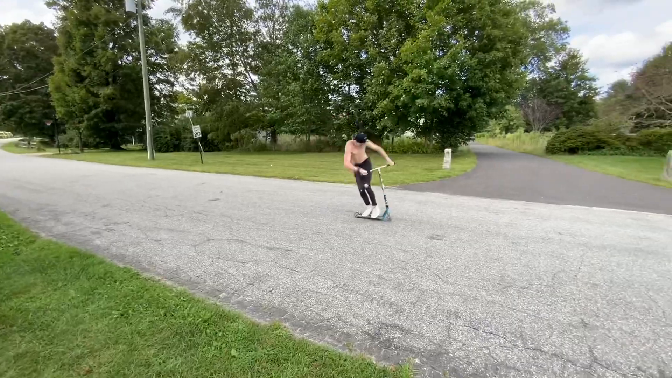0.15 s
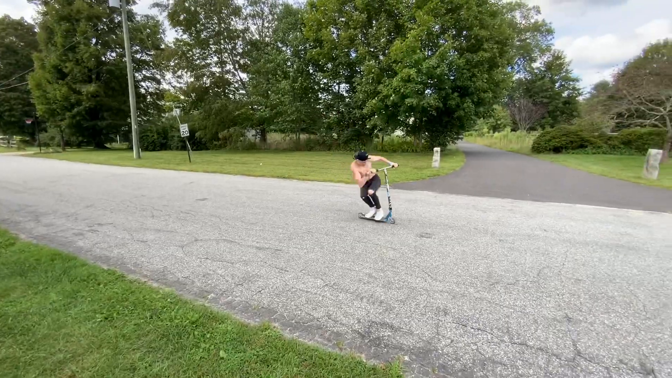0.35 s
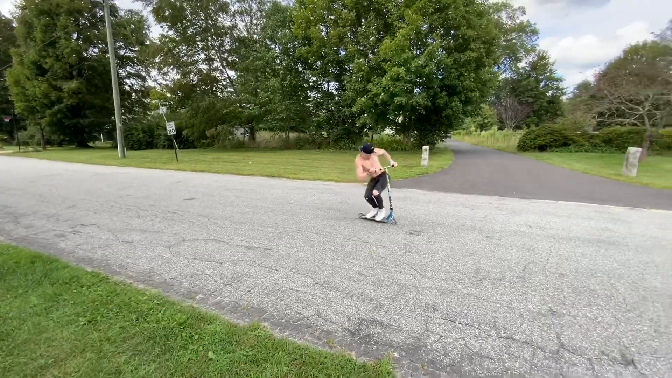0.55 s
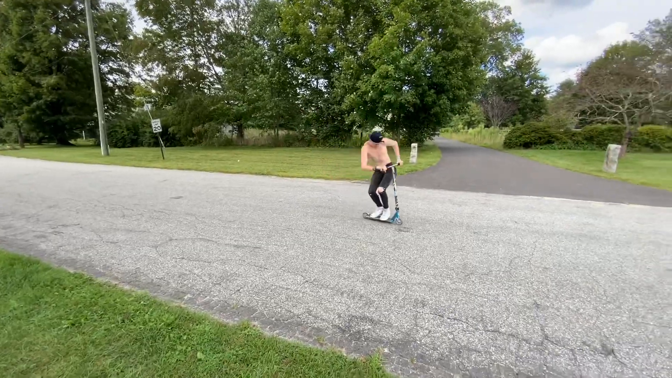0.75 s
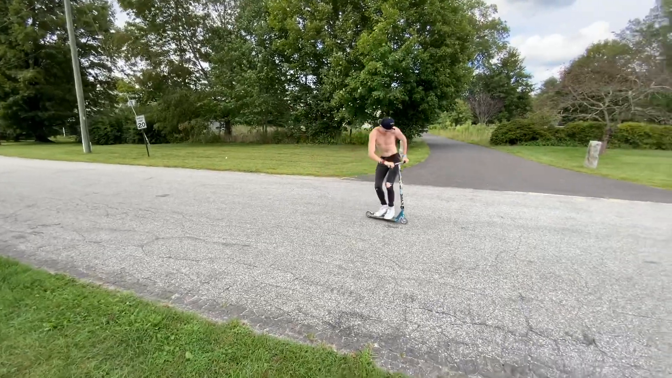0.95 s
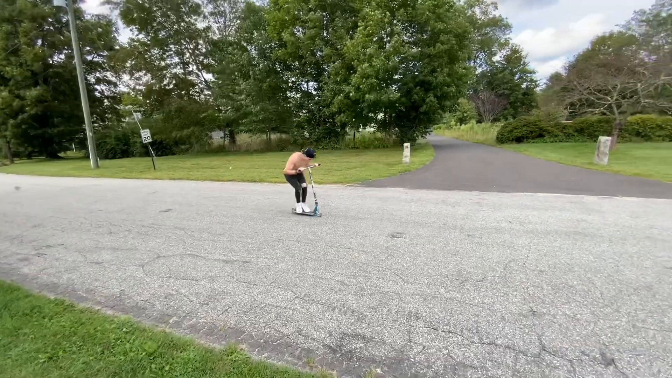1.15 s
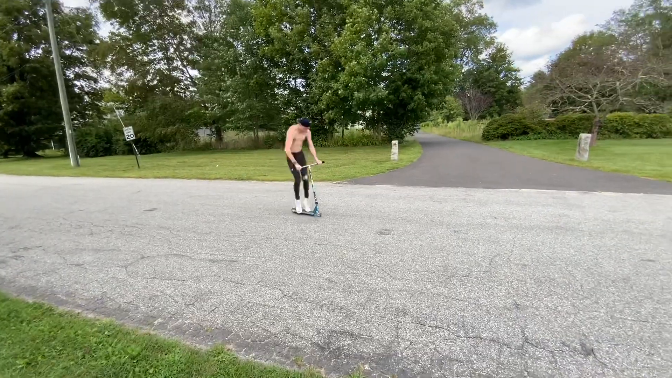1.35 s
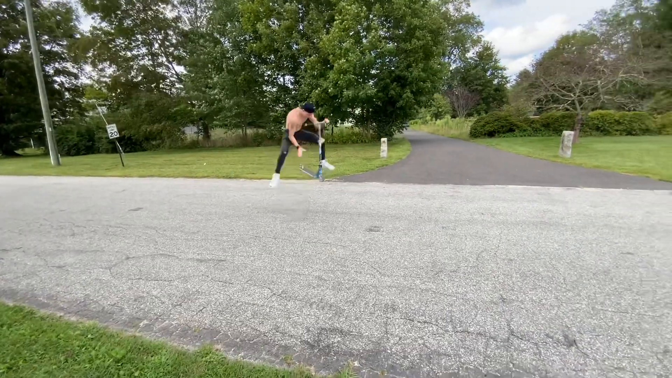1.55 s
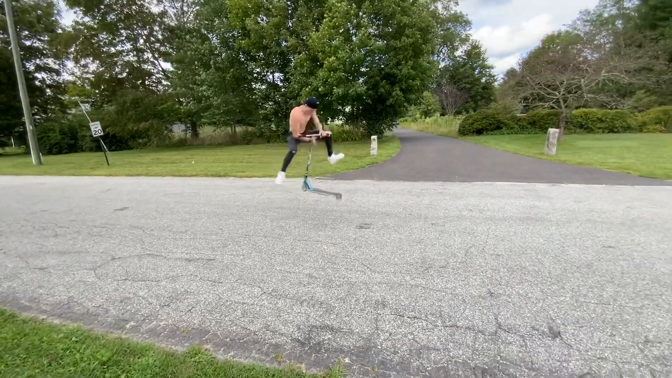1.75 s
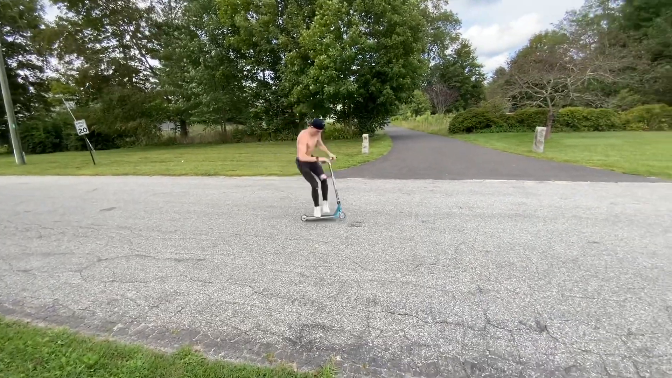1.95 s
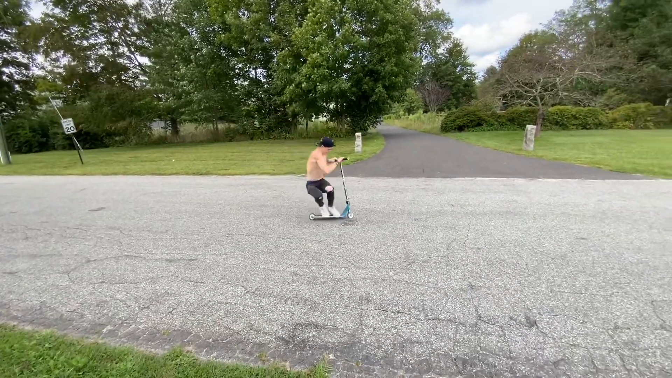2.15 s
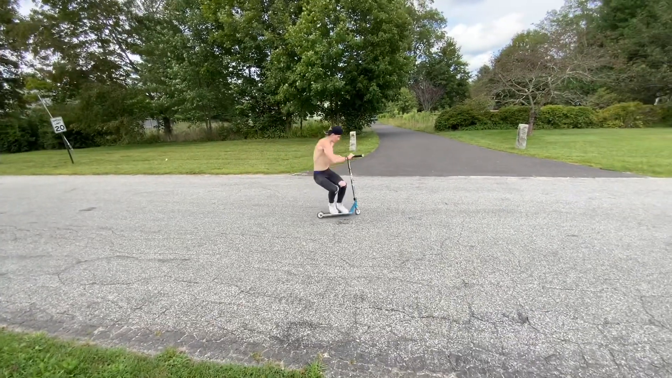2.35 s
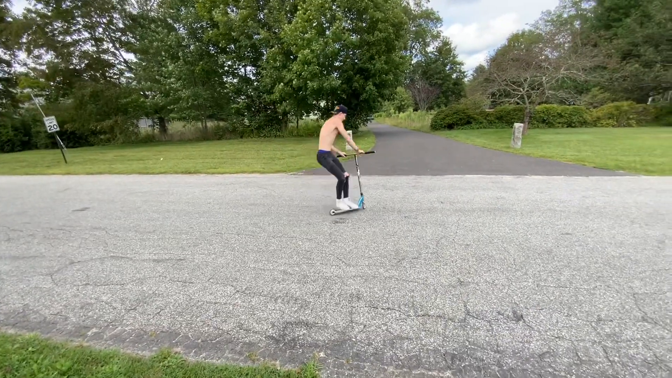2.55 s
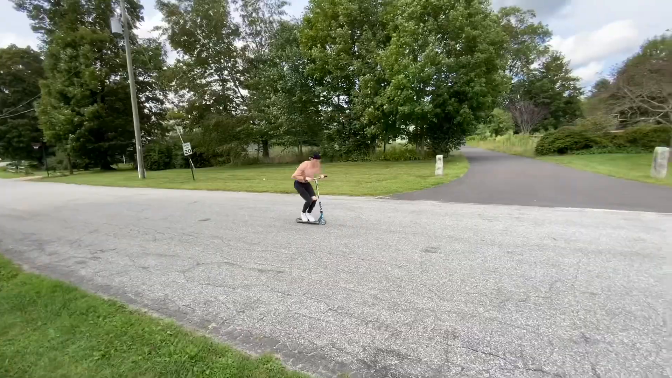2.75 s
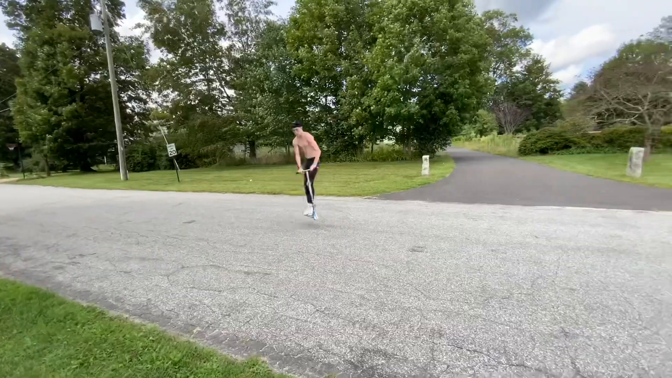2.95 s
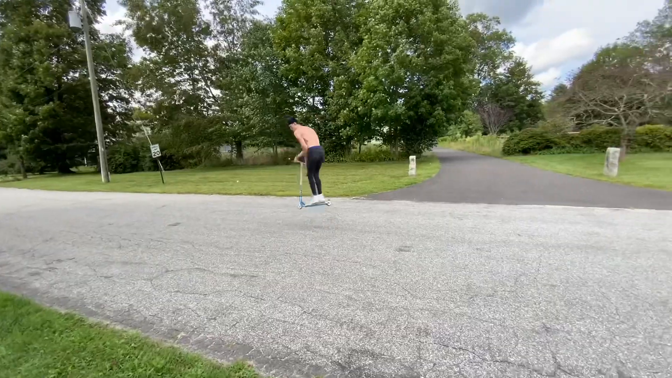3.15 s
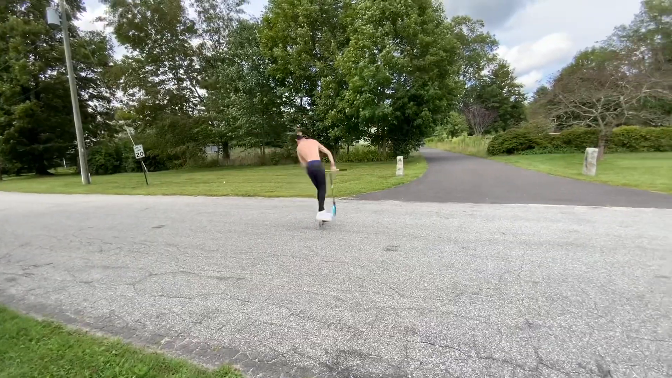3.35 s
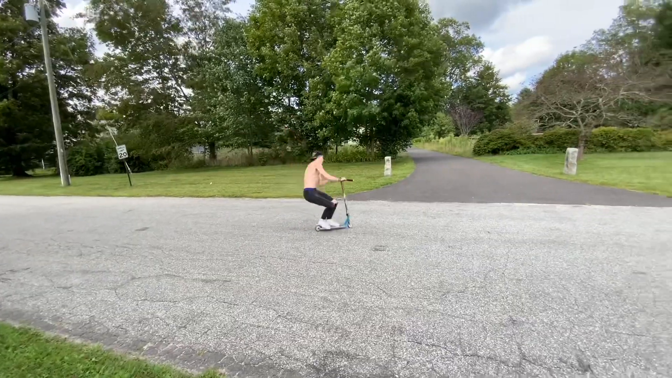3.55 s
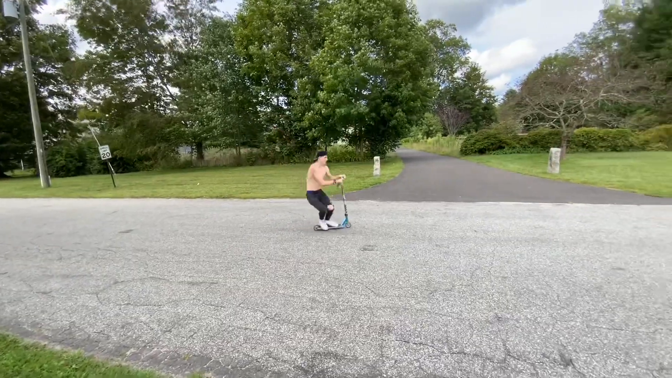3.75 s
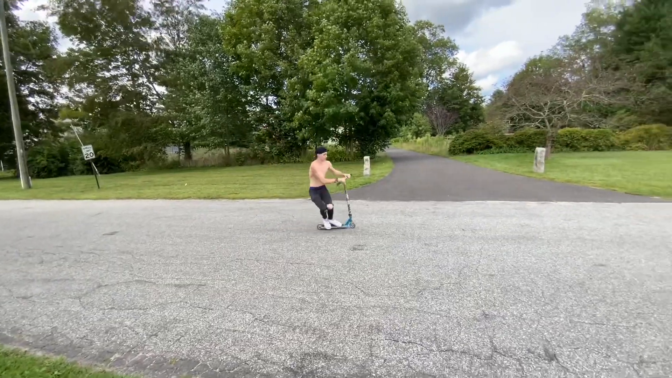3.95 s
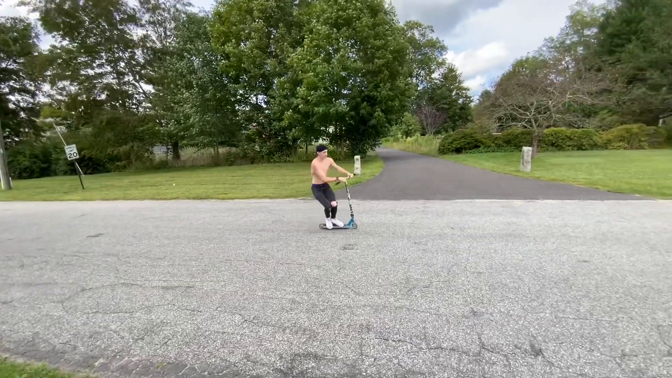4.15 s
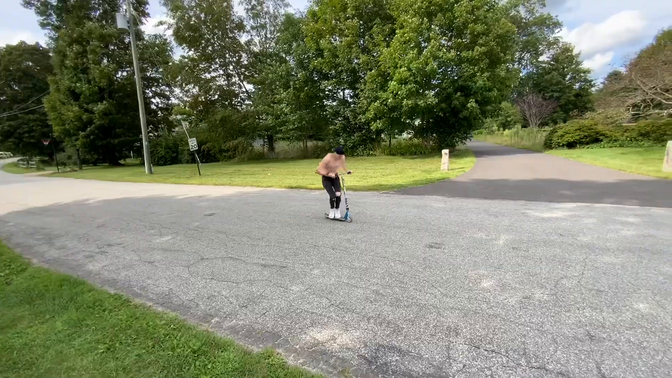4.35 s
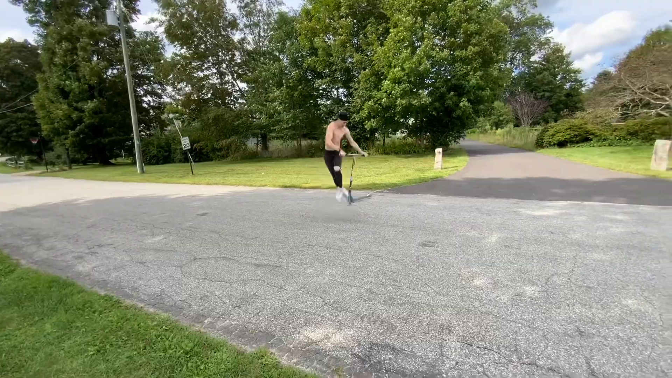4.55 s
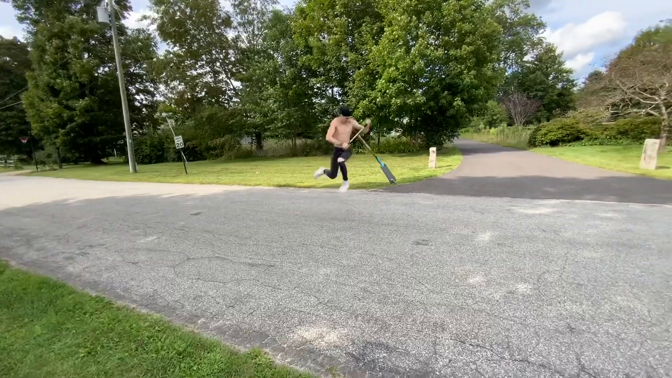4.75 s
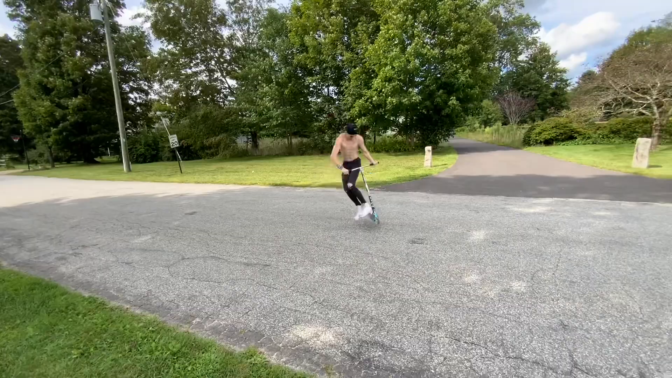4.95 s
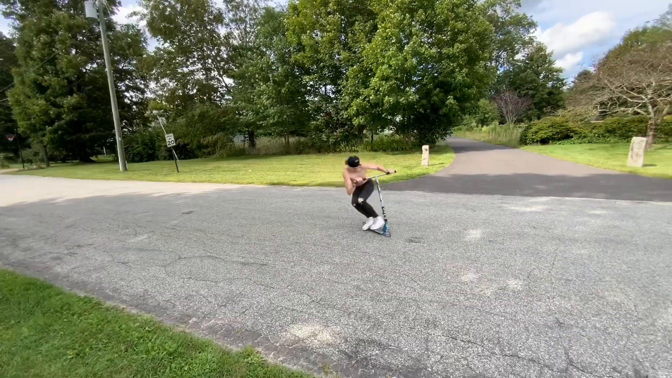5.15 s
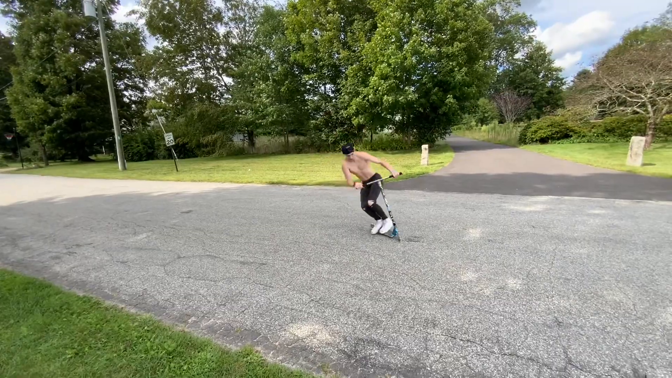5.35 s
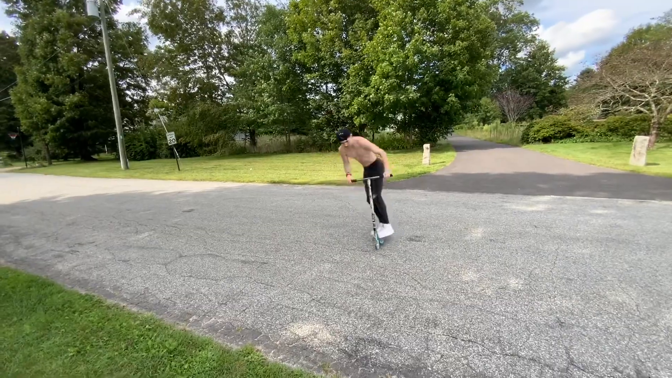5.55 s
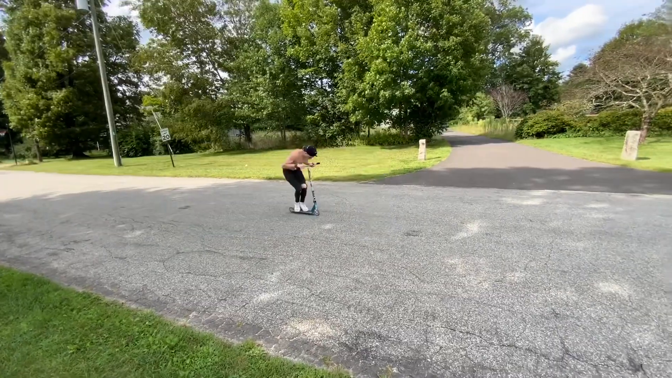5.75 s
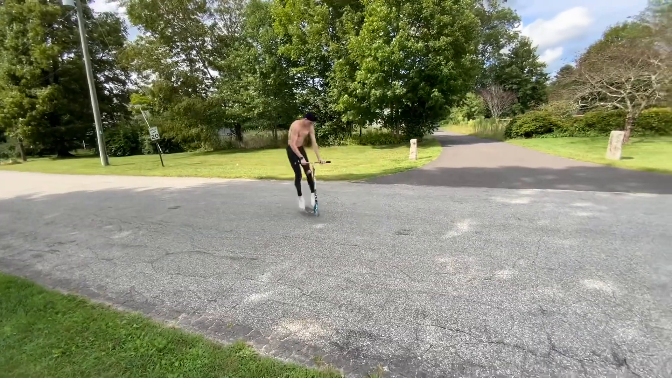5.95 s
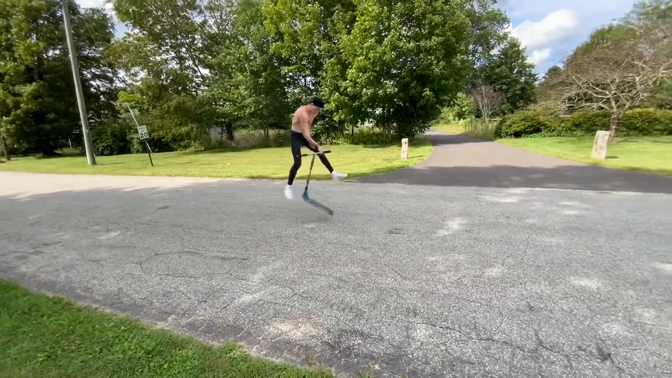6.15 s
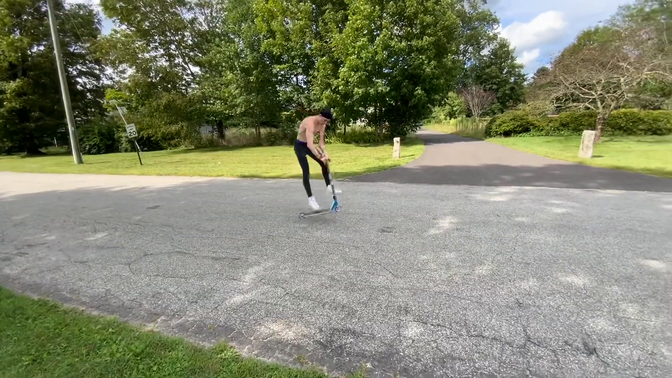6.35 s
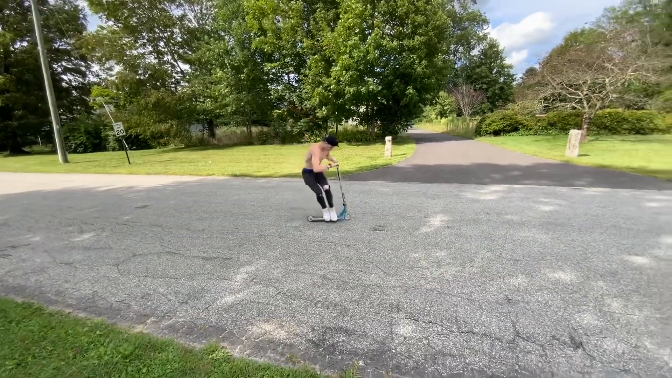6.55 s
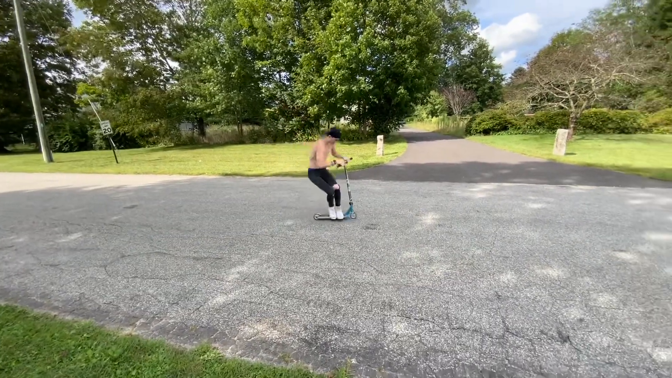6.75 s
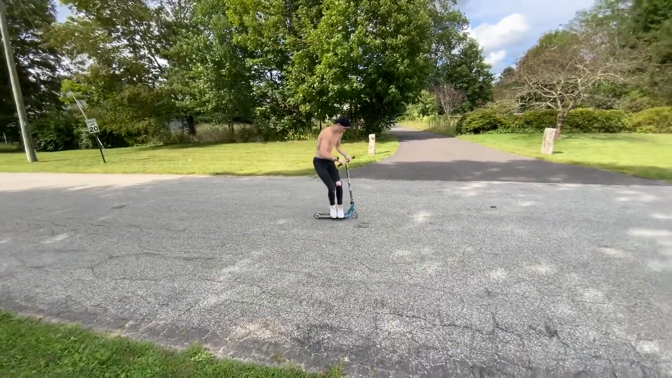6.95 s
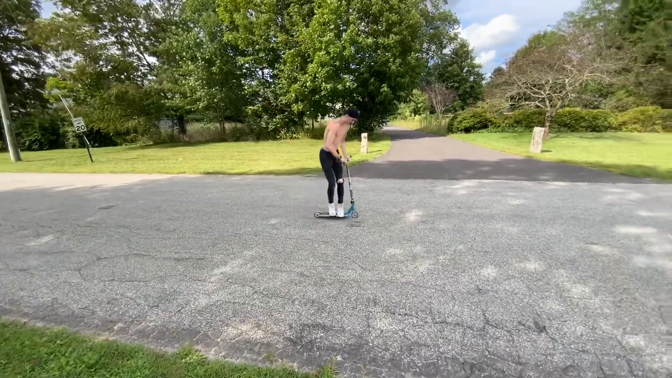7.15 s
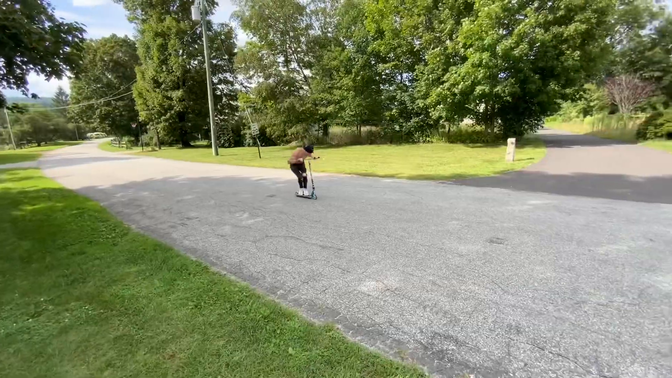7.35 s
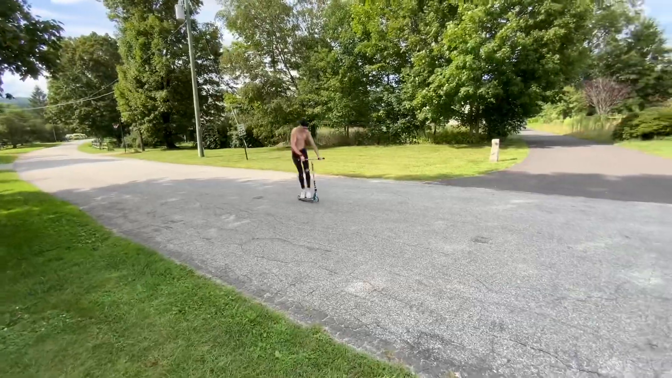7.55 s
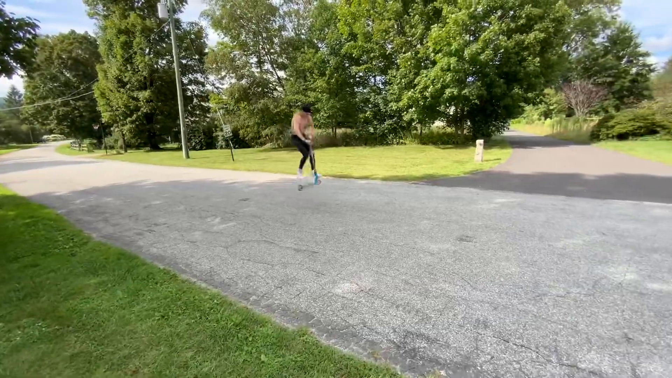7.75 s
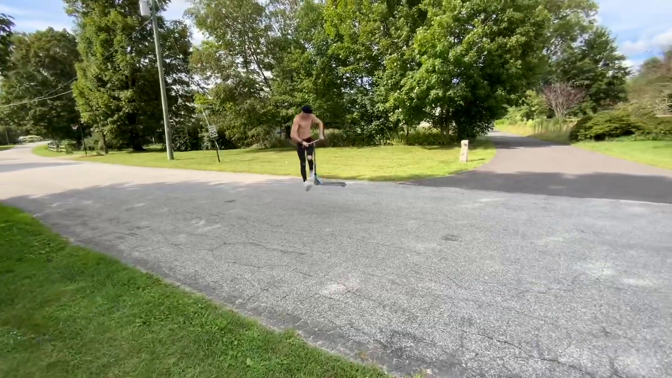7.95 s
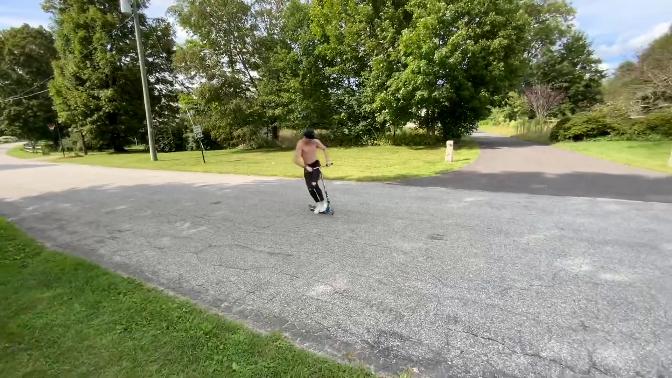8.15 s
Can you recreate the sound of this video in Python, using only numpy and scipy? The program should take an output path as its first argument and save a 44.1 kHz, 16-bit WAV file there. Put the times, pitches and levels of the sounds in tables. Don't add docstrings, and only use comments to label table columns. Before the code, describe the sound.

A breezy open road with faint steady leaf hiss, heard by a handheld stereo microphone some metres from a kick scooter. At 0.15-0.2 s a hard landing cracks, with a low thud and a quick rattle, then small wheels grind over coarse asphalt. A very brief dip at 1.0 s joins another shot; wind buffets deeply, with pops at 1.4 and 1.7 s. A double landing at 1.93-1.96 s knocks hollowly and rattles on. After a join at 2.7 s, lighter clacks precede a sharp lone slam at 3.43 s, then strong wind slaps. Following a join at 4.3 s, another hard slam at 5.0 s chatters. A join at 5.7 s brings gusts, scuffs and a pop near 6 s, then a heavy rattling landing at 6.47 s. After the 7.2 s join, scuffs and a clack at 7.84 s lead to the final sharp landing at 8.15-8.19 s.

```python
import sys
import numpy as np
from scipy import signal
from scipy.fft import rfft, irfft, next_fast_len
from scipy.io import wavfile

SR = 44100
rng = np.random.default_rng(int(sys.argv[2]) if len(sys.argv) > 2 else 0)


def invert_db(x):
    u = np.asarray(x, float) / 20
    return 10 ** u


def unload_wav(signal):
    wavfile.write(
        sys.argv[1],
        SR,
        np.round(np.clip(np.atleast_2d(signal).T, -1, 1) * 32767).astype(np.int16),
    )


N = 361619

# centre in seconds, half length of the fade in seconds.
SHOT_JOINS = [
    (1.023, 0.03),
    (2.722, 0.019),
    (4.324, 0.031),
    (5.727, 0.037),
    (7.222, 0.022),
]

# frequency in Hz, density in dB per Hz.
LEAF_COLOUR = [(40, -31), (120, -4), (400, -5), (1200, -77), (2500, 2), (5000, -3.5), (8000, 3),
               (10000, -5.5), (13000, -22), (15600, -49), (16600, -55)]

# start in seconds, hold in seconds, level in dB, bite above 200 Hz in dB.
GUSTS = [(0.013, 0.27, -36, -4.5), (0.44, 0.11, -32.5, -13.5), (1.152, 0.3, -29, -17.5),
         (1.5, 0.39, -26.5, -14), (1.926, 0.083, -34, 6), (2.318, 0.22, -30, -21.5),
         (2.857, 0.032, -33, 1.5), (3.104, 0.08, -34, -4), (3.47, .04, -40.5, -3.5), (3.602, 0.15, -38, 9),
         (3.953, 0.1, -31.5, 4.5), (4.12, 0.12, -30.5, 1), (3.288, 0.098, -31, 0.5),
         (5.37, 0.096, -43.5, -1), (5.591, 0.2, -36.5, -5), (5.797, 0.19, -23.5, -8),
         (6.034, 0.55, -29.5, -7), (6.615, 0.58, -31.5, -11), (7.31, 0.34, -33, -20),
         (6.258, 0.096, -34, 3.5), (8.155, .05, -44.5, 7)]
# frequency in Hz, density in dB per Hz.
RUMBLE_COLOUR = [(15, -50), (35, -5.5), (60, 9.5), (120, 3.5), (200, -11), (350, -28), (700, -84),
                 (2000, -110)]
BITE_COLOUR = [(100, -14), (200, 8), (350, 2.5), (600, -10), (1000, -19), (2000, -37), (5000, -110)]
# frequency in Hz, density in dB per Hz.
RIP_COLOUR = [(250, -8), (600, 3.5), (1100, -14), (1800, -24), (4000, -60)]
# start in seconds, peak in dB, pitch in Hz.
SLAPS = [(1.145, -14, 208), (1.156, -15, 118), (1.189, -16.5, 227), (1.248, -22, 223), (1.486, -15.5, 192),
         (1.499, -14.5, 169), (1.538, -19.5, 156), (1.62, -10, 153), (3.121, -16, 256), (3.154, -18, 241),
         (3.182, -28, 227), (3.307, -27, 296), (3.323, -19.5, 220), (3.657, -26, 340), (3.348, -19, 272),
         (3.384, -15, 206), (3.398, -22.5, 128), (3.601, -16, 320), (3.628, -14, 334), (3.638, -17, 261),
         (3.677, -18.5, 330), (3.723, -16, 330), (3.774, -10.5, 315), (3.784, -4, 181), (3.966, -15.5, 278),
         (3.996, -9.5, 278), (4.034, -21.5, 203), (4.163, -21, 300), (4.177, -15, 260), (4.198, -18, 185),
         (5.81, -14.5, 191), (5.859, -16, 171), (6.31, -13, 162.6), (6.327, -21, 128.5), (6.651, -19, 142),
         (6.821, -17.5, 206), (7.002, -19, 208), (7.463, -21.5, 243), (0.066, -27, 203),
         (0.548, -28.5, 111), (1.203, -16.5, 197), (1.255, -18.5, 248), (1.574, -24, 143),
         (1.691, -31, 121), (3.733, -14.5, 225), (3.756, -24, 300), (3.953, -26, 300), (4.062, -29, 254),
         (4.112, -28, 243), (4.147, -25.5, 250), (6.286, -23.5, 253), (6.521, -20.5, 131)]
# start in seconds, peak in dB.
FLUTTERS = [(0.043, -26), (0.462, -27), (0.512, -31), (0.54, -25), (1.566, -32), (1.74, -23), (2.856, -31),
            (2.884, -23), (3.098, -20), (3.551, -31), (3.812, -53), (3.941, -23), (4.094, -44),
            (4.238, -21), (4.544, -27.5), (5.377, -26.5), (5.624, -24), (6.075, -20), (6.268, -29)]
# start in seconds, peak in dB, pitch in Hz.
THUDS = [
    (.175, -9, 274),
    (.198, -31, 160),
    (1.928, -13.5, 274),
    (1.945, -10.5, 194),
    (3.432, -11, 343),
    (5.002, -14, 250),
    (6.467, -15, 207),
    (8.19, -14, 293),
]

# start in seconds, length in seconds, pitch in Hz, level in dB, blur in Hz.
WHISTLES = [(0.257, 0.34, 3024, -52.5, 4.5), (1.416, 0.17, 3020, -48.5, 5.5), (2.733, 0.4, 7320, -47, 310),
            (5.351, 0.073, 7600, -44, 17), (5.652, 0.065, 3020, -44.5, 5), (6.535, 0.23, 2990, -52, 4.6),
            (2.25, 0.11, 5880, -55, 16), (6.022, 0.032, 2490, -38, 8), (7.633, 0.094, 2920, -47.5, 82),
            (7.826, 0.14, 371, -47.5, 17), (2.05, 0.16, 182.7, -44, 8.1), (7.046, 0.19, 267, -42.5, 34)]

# time in seconds, level in dB.
ROLL_LEVEL = [(0.0, -48.5), (.18, -52), (.3, -36), (.43, -51.5), (1.12, -48), (1.53, -41.5), (1.71, -47),
              (1.96, -49.5), (2.08, -37.5), (2.21, -46), (3.61, -38.5), (3.75, -42.5), (4.96, -45),
              (5.16, -39.5), (6.3, -44.5), (6.44, -43), (7.28, -49), (8.2, -52.5)]
# frequency in Hz, density in dB per Hz.
GRIND_COLOUR = [(200, -61), (600, 2.5), (1300, 3), (2500, 2), (5000, -0.5), (8000, 0), (10000, 1),
                (13000, -8), (15600, -13), (16600, -42)]
# start in seconds, end in seconds, level in dB, bar modes in dB, fork modes in dB.
HUMS = [(0.306, 0.448, -48, -1, -21), (0.524, 0.957, -57, 0.5, -12), (1.036, 1.144, -49, -4, -9),
        (1.298, 1.496, -48, -1, -2), (1.978, 2.264, -50, -17, -2.5), (2.434, 2.54, -51.5, 6, -12),
        (5.073, 5.185, -58, -3, 7), (5.36, 5.5, -49, -34, -29), (6.493, 6.79, -55, -11, 3),
        (7.217, 7.396, -48, -22, 4), (7.498, 7.63, -44, -28, -2.5), (7.612, 7.732, -76, 24, 24)]
# frequency in Hz, width in Hz, gain in dB.
DECK_HUM = [(1215.5, 19, 4.5), (1385, 86, -3), (1716, 98, -4.5)]
BAR_HUM = [(4570, 130, 11), (5400, 370, 2)]
FORK_HUM = [(3990, 92, 4), (5195, 84, 7), (5880, 45, -7)]

# start in seconds, peak in dB, pitch in Hz, ring t60 in seconds.
BONKS = [(0.175, -25, 410, 0.051), (0.184, -17, 635, 0.071), (0.199, -33, 1310, 0.053),
         (1.407, -26, 1176, 0.068), (1.68, -24, 1376, 0.065), (1.907, -19, 830, 0.055),
         (1.925, -9, 570, 0.047), (1.943, -8, 647, 0.092), (1.994, -19, 577, 0.023),
         (3.264, -22.5, 627, 0.088), (3.434, -9.5, 1700, 0.016), (3.776, -15.5, 1100, 0.032),
         (3.265, -27, 1240, .05), (6.287, -23, 890, 0.037), (6.3, -30, 656, .03), (5.0, -7.5, 1273, 0.018),
         (5.006, -10, 1010, 0.021), (5.019, -16, 528, 0.087), (6.458, -22, 1210, 0.066),
         (6.486, -15, 846, 0.06), (6.525, -28, 775, 0.066), (7.843, -18, 1030, 0.022),
         (8.146, -17, 813, 0.047), (8.183, -14.5, 920, 0.053), (8.152, -6, 6160, .02),
         (8.183, -7, 5570, .04), (1.412, -27, 1210, 0.082)]

# start in seconds, peak in dB, body below 1.5 kHz in dB.
SCUFFS = [(0.363, -33.5, -10.5), (1.0472, -39, -29), (1.565, -27.5, -18), (2.205, -28, -3),
          (3.04, -27.5, -9), (3.094, -28.5, -4.5), (3.13, -36, 2), (3.666, -32, -3), (4.436, -26.5, -3.5),
          (5.592, -31.5, -9.5), (5.66, -32, -14), (5.937, -23.5, -3), (6.0237, -25, -48),
          (6.2262, -26.5, -5.5), (6.336, -27, -20), (6.4515, -26, 7.5), (6.6868, -28, -4),
          (7.241, -30.5, -44), (7.581, -20.5, -5), (7.834, -18.5, -7)]
# start in seconds, peak in dB, body in dB.
TICKS = [(0.583, -33.5, -4.5), (0.9038, -24, -8), (1.106, -24.5, -14.5), (1.595, -23, -13),
         (1.618, -23.5, -20), (2.134, -30.5, -13), (2.448, -17.5, -26), (2.612, -22, -16),
         (2.675, -19, -9.5), (2.964, -26.5, -14), (3.24, -29, -8), (4.472, -18.5, -32), (4.698, -29, -8),
         (4.8055, -32.5, -23), (4.953, -30, -14), (5.343, -24, -8), (5.37, -30.5, -31), (5.547, -26.5, -11),
         (5.901, -31.5, -9), (6.191, -22.5, -12), (6.8174, -31.5, -43), (6.989, -29, -27),
         (7.309, -28.5, -22), (7.546, -23, -19), (7.9781, -36.5, -2)]
# start in seconds, peak in dB, body in dB.
RATTLES = [(0.1983, -13, -15), (0.2114, -16.5, -14), (0.2244, -23, -12), (0.2364, -22, -19),
           (0.2536, -23, -17), (0.2887, -33, -18), (1.408, -24, -7), (1.4194, -23, -27), (1.4335, -25, -21),
           (1.979, -16, -15), (1.9924, -13.5, -7), (2.0048, -19.5, -11), (2.0148, -20.5, -7),
           (2.029, -18, -21), (2.0445, -23, -17), (2.0537, -33, -17), (2.0797, -40, -22), (2.095, -32, -14),
           (2.1194, -37, 4), (2.1777, -35, 2), (2.3261, -44, -21), (2.4152, -35, -5), (2.479, -38.5, 6.5),
           (2.506, -41.5, 12), (3.2895, -18.5, -33), (5.017, -18.5, -23), (5.0305, -23, -23),
           (5.0421, -16, -12), (5.0509, -27, -8), (5.0614, -22, -21), (5.0794, -25, -19),
           (5.9798, -23.5, -32), (5.9994, -22, -36), (6.4857, -22, -7), (6.4964, -26, -11),
           (6.5102, -22.5, -28), (6.5267, -19, -8), (6.5464, -19.5, -9), (6.5745, -16, -18),
           (6.5897, -26, -14), (6.6038, -24, -18), (6.6193, -31, -23), (6.667, -37, -9),
           (6.7207, -34.5, -14), (7.8643, -19, -35), (7.8684, -18, -20.5), (7.886, -15, -22.5),
           (7.8979, -22, -21), (7.908, -35, -20), (7.9202, -30, -19)]
# start in seconds, peak in dB, body in dB.
SNAPS = [(1.9064, -28, -8), (2.375, -21, -42), (4.934, -26, 8), (4.939, -24, -7.5), (5.043, -22, -7),
         (5.062, -15.5, -26), (5.081, -28, -18), (8.152, -17.5, -44), (0.176, -2, -22), (0.2, -30, -12),
         (1.9568, -6.5, -4), (6.486, -15, -4), (3.81, -44, 13), (3.836, -55, 1), (4.092, -48, 6),
         (2.054, -32, -18), (5.163, -33, 1), (6.228, -48, -5)]
# start in seconds, peak in dB, body in dB, scrape length in seconds.
SLAMS = [(.1387, -16, -6.5, 0.015), (.158, -9.5, -28, 0.0052), (.1737, -7, -6, 0.0063),
         (.1847, -9.5, -9.5, 0.0073), (1.3797, -14.5, -10, 0.019), (1.3957, -13, -29, 0.0081),
         (1.678, -15, -23, 0.0074), (1.686, -16.5, -31, 0.01), (1.9245, -13.5, -1, 0.0098),
         (1.9415, -9.5, -10.5, 0.016), (1.9564, -5.5, -36, 0.013), (1.9644, -24, -29, 0.012),
         (2.2132, -15.5, -29, 0.0086), (2.9212, -17, -16, 0.018), (3.271, -12, -20, 0.013),
         (3.4293, -1, -12.5, 0.0051), (3.4385, -7, -11, 0.0062), (4.9986, -2.5, -11.5, 0.004),
         (5.0046, -5.5, -21, 0.0037), (5.225, -17, -14, 0.0092), (5.6434, -17, -10.5, 0.019),
         (5.9586, -14.5, -21, 0.01), (6.263, -18.5, -15, 0.015), (6.4612, -4, -14, 0.0063),
         (6.4725, -3, -16, 0.0069), (7.5966, -13, -29, 0.011), (7.843, -8, -27, 0.0055),
         (8.1467, -17, 6, 0.0063), (8.1803, -2, -6, 0.0035), (8.189, -5.5, -16, .014)]
# frequency in Hz, density in dB per Hz.
KNOCK_COLOUR = [(150, -2.5), (300, 14), (1300, -2), (2500, 2.5), (4500, -7.5), (7000, -5), (9500, 9.5),
                (13000, -11.5), (15600, -13), (16600, -51)]
# frequency in Hz, width in Hz, gain in dB.
DECK_MODES = [(633, 32, 6.5), (872, 136, 5.5), (1210, 114, 7.5), (1433, 87, 6.5), (1750, 123, 0),
              (13120, 30, -1), (2980, 550, -5.5), (3590, 59, -4.5), (4260, 360, 6), (4643, 55, 8),
              (5376, 540, 7.5), (5880, 280, -2), (6690, 186, 2.5), (7320, 115, 1.5), (12400, 5600, -14)]

# frequency in Hz, left lead in radians.
PORT_LEAD = [(0, 0), (430, .2), (1030, 1), (1720, -1), (2400, -2.1), (2950, -4.4), (3400, -5.8),
             (4220, -6.4), (6500, -7.3), (8200, -8.3), (8750, -9.2), (11600, -9.75), (13000, -12.5),
             (16300, -12.6)]
# frequency in Hz, left over right in dB.
PORT_TILT = [(700, 2), (1500, .5), (5000, -1.2), (8000, 0)]
# frequency in Hz, gain in dB.
DULL = [(3000, 0), (6000, -3), (8200, -20), (9000, -30)]

PORT_SIGN = np.array([[1], [-1]])


def evened(x):
    return x / np.sqrt(np.mean(x ** 2) + 1e-20)


def read(points, hz):
    f, value = np.transpose(points)
    return np.interp(np.log(hz + 1), np.log(f + 1), value)


def add(mix, s, sound):
    part = mix[..., round(s * SR):][..., :sound.shape[-1]]
    part += sound[..., :part.shape[-1]]


def colour(x, response):
    size = next_fast_len(x.shape[-1] + 2048, True)
    hz = np.fft.rfftfreq(size, 1 / SR)
    return irfft(rfft(x, size) * response(hz), size)[..., :x.shape[-1]]


def ringing(hz, modes, weights, widen):
    return sum(k * invert_db(db) / (1 + 2j * (hz - f) / (w * widen)) for k, (f, w, db) in zip(weights, modes))


def lumps(per_s, shape):
    r = np.exp(-2 * np.pi * per_s / SR)
    x = signal.lfilter([1], [1, -2 * r, r * r], rng.standard_normal(shape))
    return evened(x - x.mean())


def leaves():
    hiss = evened(colour(rng.standard_normal((2, N)), lambda hz: invert_db(read(LEAF_COLOUR, hz))))
    return invert_db(-55 + 0.19 * lumps(0.71, N)) * hiss


def gusts():
    rise, sag, fall = 522, 13.5, 182
    calm_db, calm_bite_db = -46.5, -9
    t = np.arange(0, N + 64, 64) / SR
    low = np.full(len(t), invert_db(calm_db))
    bite = np.full(len(t), invert_db(calm_db + calm_bite_db))
    for s, hold, db, bite_db in GUSTS:
        loss_db = rise * np.maximum(s - t, 0) + sag * np.maximum(t - s, 0)
        loss_db = loss_db + fall * np.maximum(t - s - hold, 0)
        low = np.maximum(low, invert_db(db - loss_db))
        bite = np.maximum(bite, invert_db(db + bite_db - loss_db))
    return [np.interp(np.arange(N) / SR, t, gain) for gain in (low, bite)]


def wind():
    low_gain, bite_gain = gusts()
    air = rng.standard_normal((3, N))
    air = air[0] + .4 * air[1:]
    step = 1j * PORT_SIGN
    low = evened(colour(air, lambda hz: invert_db(read(RUMBLE_COLOUR, hz)) * np.exp(0.66 * step)))
    low = low * invert_db(2.86 * lumps(24.0, N))
    bite = evened(colour(air, lambda hz: invert_db(read(BITE_COLOUR, hz)) * np.exp(0.83 * step)))
    bite = bite * invert_db(-2.5 + 4.56 * lumps(32, N))
    return low_gain * low + bite_gain * bite


def puffs():
    out, t = np.zeros((2, N)), np.arange(2600) / SR
    flutter_hz = 178.6
    for s, db, hz in SLAPS + THUDS + [(*row, flutter_hz) for row in FLUTTERS]:
        skew, pan_db = rng.uniform(-0.74, 1, 2)
        length = 2.78 / hz
        glide = 0.765 + 1.736 * np.exp(-t / 0.0037)
        turns = np.cumsum(hz * (glide + 0.1 * lumps(63, len(t)))) / SR
        port_turns = turns + (0.07 + 0.062 * skew) * PORT_SIGN
        thump = np.exp(-(t / length) ** 1.17) * np.sin(2 * np.pi * port_turns)
        flap = evened(colour(rng.standard_normal(len(t)), lambda f: invert_db(read(BITE_COLOUR, f / 0.97))))
        flap = invert_db(-6.5 - 60 * t / 0.043) * flap
        rip = evened(colour(rng.standard_normal(len(t)), lambda f: invert_db(read(RIP_COLOUR, f))))
        rip = invert_db(-11) * np.exp(-(t / 0.0047) ** 2 / 2) * rip
        onset = 1 - np.exp(-(t / 0.0039) ** 2)
        puff = onset * (thump + flap + rip)
        add(out, s - .003, invert_db(db + 2.0 * pan_db * PORT_SIGN) * puff / abs(puff).max())
    return signal.sosfilt(signal.butter(4, 2500, fs=SR, output="sos"), out)


def whistles():
    out = np.zeros(N)
    for s, length, hz, db, blur_hz in WHISTLES:
        n = round(length * SR)
        turns = np.cumsum(hz + blur_hz * lumps(136, n)) / SR
        swell = np.sqrt(np.hanning(n)) * invert_db(1.5 * lumps(25, n))
        add(out, s, invert_db(db) * np.sqrt(2) * np.sin(2 * np.pi * turns) * swell)
    return out


def hum(grit, modes):
    throbs = grit * invert_db(4.5 * lumps(45, N))
    return evened(colour(throbs, lambda hz: ringing(hz, modes, [1, -1, 1], 1.0)))


def roll():
    grit = rng.standard_normal(N) * invert_db(2.0 * lumps(380, N) + 0.87 * lumps(40, N))
    grind = evened(colour(grit, lambda hz: invert_db(read(GRIND_COLOUR, hz))))
    roll_s, roll_db = np.transpose(ROLL_LEVEL)
    out = invert_db(np.interp(np.arange(N) / SR, roll_s, roll_db) - 5.0) * grind
    deck, bar, fork = [hum(grit, modes) for modes in (DECK_HUM, BAR_HUM, FORK_HUM)]
    for start, end, db, bar_db, fork_db in HUMS:
        part = slice(round(start * SR), round(end * SR))
        loaded = deck[part] + invert_db(bar_db) * bar[part]
        loaded = loaded + invert_db(fork_db) * (fork[part] + .9 * grind[part])
        add(out, start, invert_db(db) * loaded * signal.windows.tukey(len(loaded), .45))
    return out


def bonks():
    out, t = np.zeros(N), np.arange(4096) / SR
    for s, db, hz, t60 in BONKS:
        blow = rng.standard_normal(len(t)) * np.exp(-t / 0.0019)
        tones = np.sin(2 * np.pi * hz * t) + 0.28 * np.sin(2 * np.pi * 1.27 * hz * t)
        ring = invert_db(-60 * t / max(t60, .01)) * tones
        x = signal.fftconvolve(blow, ring)[:len(t)]
        add(out, s, invert_db(db - 2.0) * x / abs(x).max())
    return out


def knock_rows():
    tick_s, scuff_s, snap_s, rattle_s = 0.0065, 0.023, 0.00099, 0.01
    single = SLAMS + [(*row, tick_s) for row in TICKS] + [(*row, scuff_s) for row in SCUFFS]
    rows = [(s, db, body_db, -7.5 + 0.67 * db, scrape) for s, db, body_db, scrape in single]
    rows += [(s, db, body_db, -16.5, snap_s) for s, db, body_db in SNAPS]
    rows += [(s, db, body_db, -14, rattle_s) for s, db, body_db in RATTLES]
    return rows


def clacks():
    out, t = np.zeros(N), np.arange(3400) / SR
    band = signal.butter(2, [1500, 8000], "bandpass", fs=SR, output="sos")
    for s, db, body_db, edge_db, scrape in knock_rows():
        chatter = rng.standard_normal(len(t)) * invert_db(3.62 * lumps(810, len(t)))
        build_up = 1 - np.exp(-t / (.0004 + .003 * invert_db(db)))
        crack = build_up * (1 + 1.2 * np.exp(-t / .002))
        after = np.maximum(t - scrape, 0)
        decay = invert_db(-60 * after / (.012 + 1.8 * scrape)) + invert_db(-27 - 60 * after / .12)
        spot = rng.choice([-1, 1], len(DECK_MODES)) * rng.uniform(0.3, 2.3, len(DECK_MODES))
        lean = [(900, body_db), (2200, 0), (8500, 0.009), (11500, edge_db + 24.5)]  # (Hz, dB)

        def struck(hz):
            scraped = invert_db(read(KNOCK_COLOUR, hz) + read(lean, hz))
            return scraped * (1 + 3.2 * ringing(hz, DECK_MODES, spot, 1.2))

        x = colour(chatter * crack * decay, struck)
        add(out, s, invert_db(db) * x / abs(signal.sosfilt(band, x)).max())
    return out


def verge(x):
    t = np.arange(9000) / SR
    sparse = rng.standard_normal((2, len(t))) * (rng.random((2, len(t))) < .05)
    taps = sparse * invert_db(-60 * t / 0.25) * (t > .004)
    return signal.oaconvolve(x[None], taps / np.linalg.norm(taps[0]), axes=1)[:, :N]


def road_bounce(knocks):
    late = colour(knocks, lambda hz: invert_db(read(DULL, hz)) * np.exp(-2j * np.pi * hz * .0009))
    return invert_db(-15) * late * np.array([[1], [.3]])


def ports(x):
    side = PORT_SIGN / 2
    return colour(x[None], lambda hz: np.exp(1j * side * read(PORT_LEAD, hz)) * invert_db(side * read(PORT_TILT, hz)))


def scene():
    hiss = leaves()
    knocks = bonks() + clacks()
    scooter = whistles() + roll() + knocks
    around = invert_db(-11) * verge(scooter) + .9 * hiss[::-1]
    scattered = colour(around, lambda hz: invert_db(read(DULL, hz)))
    return ports(scooter + hiss[0]) + road_bounce(knocks) + scattered + wind() + puffs()


def band_limit(x):
    return signal.sosfilt(signal.butter(12, 16690, fs=SR, output="sos"), x)


def record(dry):
    t = np.arange(N) / SR
    nearest_join = np.min([abs(t - s) / half for s, half in SHOT_JOINS], axis=0)
    fade = np.clip(0.0075 + nearest_join, 0, 1)
    limited = .95 * np.tanh(dry * fade / .95)
    mix = colour(limited, lambda hz: np.clip((16700 - hz) / 500, 0, 1))
    return band_limit(mix)


dry = scene()
out = record(dry)
unload_wav(out)
```